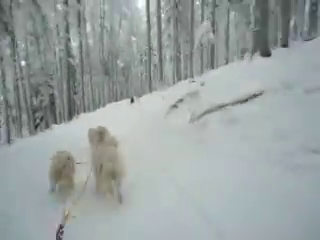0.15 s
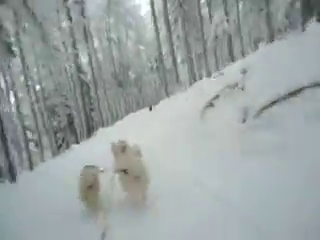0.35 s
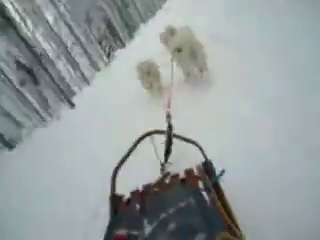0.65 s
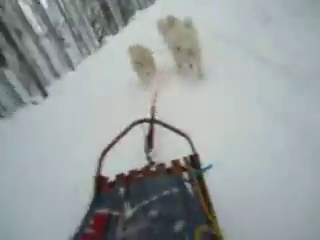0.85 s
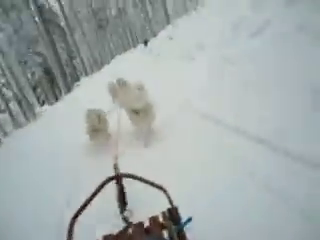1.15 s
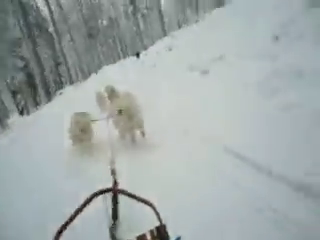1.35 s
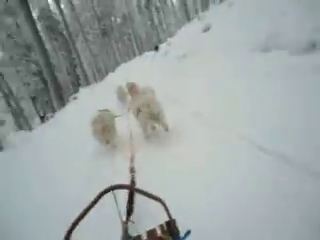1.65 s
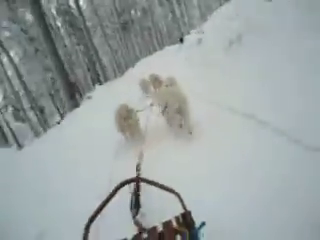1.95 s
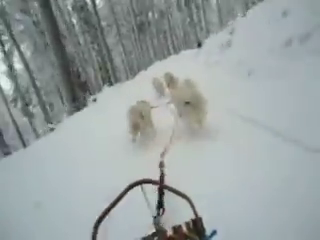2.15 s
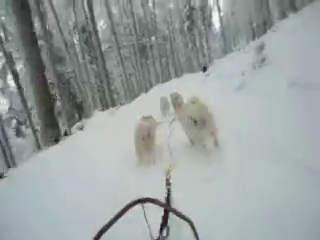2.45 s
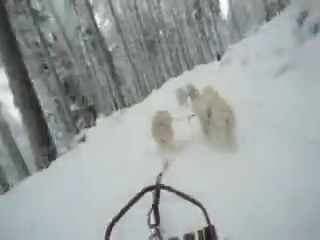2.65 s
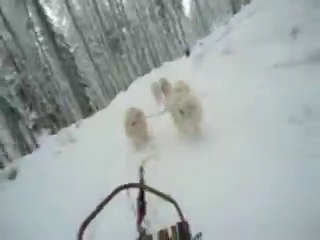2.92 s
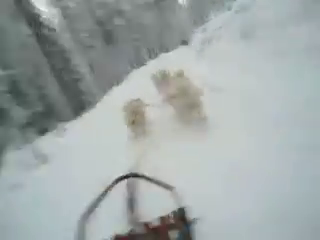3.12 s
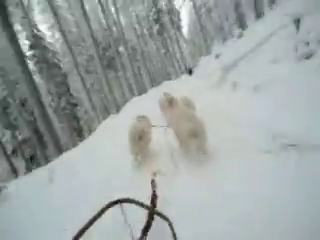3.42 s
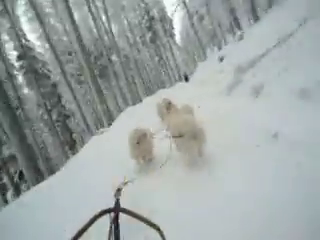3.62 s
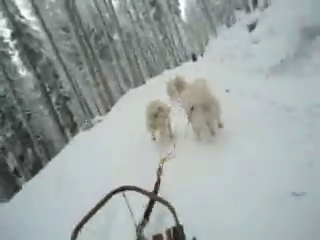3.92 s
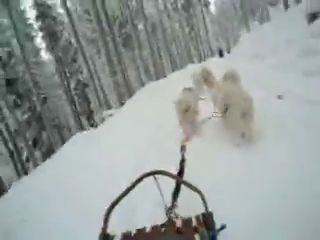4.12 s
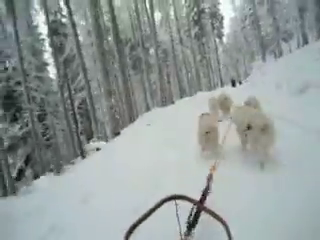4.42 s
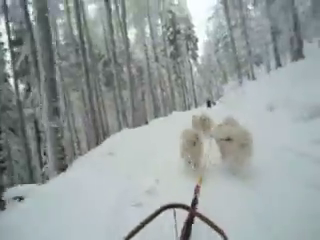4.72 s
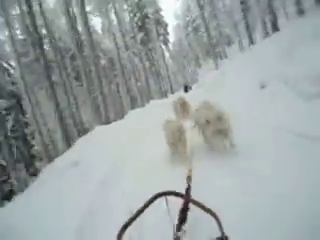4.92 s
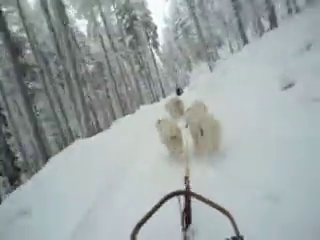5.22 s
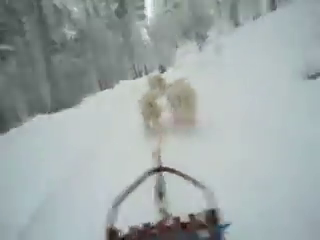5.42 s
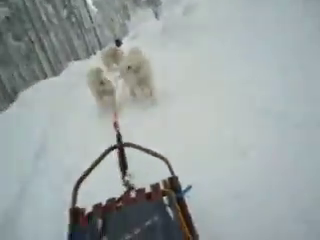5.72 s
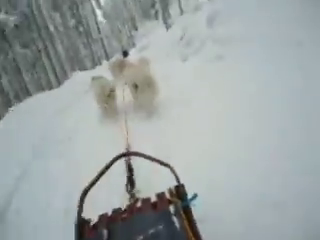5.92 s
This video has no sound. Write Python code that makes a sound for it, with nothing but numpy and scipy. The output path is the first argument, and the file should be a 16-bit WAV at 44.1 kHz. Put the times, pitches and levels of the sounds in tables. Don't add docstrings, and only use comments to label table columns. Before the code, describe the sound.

Rough, clipped wind buffeting with thuds, snaps and brief dropouts, over the grainy hiss of a dog sled on packed snow.

```python
import sys
import numpy as np
from scipy import signal
from scipy.fft import rfft, irfft
from scipy.io import wavfile
from scipy.ndimage import uniform_filter1d

SR = 44100
rng = np.random.default_rng(int(sys.argv[2]) if len(sys.argv) > 2 else 0)


def unload_audio(sound):
    columns = np.transpose(np.atleast_2d(sound))
    steps = np.round(np.clip(columns, -1, 1) * 32767)
    wavfile.write(sys.argv[1], SR, steps.astype(np.int16))


def nominal_scale(level):
    x = np.asarray(level, float) / 20
    return 10 ** x


N = 267585
TIME = np.arange(N) / SR
STOP = .692

# [t/s, eddy pressure over the overload point/dB, flapping rate f/Hz]
WIND = [(0, -3, 79.1), (0.252, -10, 91), (.45, 3, 92), (0.752, 4.5, 157.4), (0.899, 11, 302),
        (1.1, 4, 115.7), (1.6, 3, 66.3), (2.098, 14, 150), (2.22, 14.5, 279), (2.752, 9.5, 157.4),
        (2.922, 22.5, 248), (3.049, -16, 131.5), (3.201, 26.5, 204), (3.45, 5.5, 120.4), (4.201, 1, 111),
        (4.319, 15.5, 135), (5.45, 15, 150), (6.07, -3, 44.9)]


def evened(x):
    return x / np.sqrt(np.mean(x ** 2) + 1e-20)


def read_spectrum(points, f):
    at, value = np.transpose(points)
    return np.interp(np.log(f + 0.0028), np.log(at), value)


def wander(hz):
    spectrum = rfft(rng.standard_normal(N))
    spectrum = spectrum / (1 + (np.fft.rfftfreq(N, 1 / SR) / hz) ** 4)
    return evened(irfft(spectrum, N))


def noise(gain, size):
    z = rng.standard_normal((gain.shape[1], len(gain), 2)).T
    z = (z[0] + 1j * z[1]) * gain / np.linalg.norm(gain, axis=0)
    sound = signal.istft(z, nperseg=size, noverlap=size * 3 // 4)[1]
    return evened(sound[:N])


def gate(starts, lengths_ms, heights):
    out = np.zeros(N)
    for s, ms, height in zip(starts, lengths_ms, heights):
        out[round(s * SR):round((s + ms / 1000) * SR)] = height
    return out


def wind_db():
    s, pressure_db, _ = np.transpose(WIND)
    return np.interp(TIME, s, pressure_db)


def eddies(shape, s, flap_hz, size):
    hz = np.fft.rfftfreq(size, 1 / SR)
    t = np.arange(4 * N // size + 5) * size / 4 / SR
    multiple = hz[:, None] / np.interp(t, s, flap_hz)
    return noise(nominal_scale(read_spectrum(shape, multiple)), size=size)


def headwind():
    calm, calm_db = lulls()
    flapping = large_eddies(calm, calm_db) + small_eddies(calm)
    push = air_lumps()
    held = uniform_filter1d(abs(push), 80)
    free = 1 - np.clip(1.7 * held, 0, 1)
    swell = 1.75 * uniform_filter1d(uniform_filter1d(push, 90), 90)
    creep = uniform_filter1d(uniform_filter1d(push, 400), 400)
    creep = 1.25 * calm * creep
    return STOP * (swell + creep + flapping * free)


def lulls():
    # [t/s, length/ms, eddy pressure level/dB]
    lull_list = [(0.323, 15, -7), (0.385, 10, 7.5), (0.401, 23, 0), (0.578, 20, -3.5), (1.402, 4.1, -1),
                 (1.422, 20, -5.5), (1.484, 11, -21), (1.522, 13, -16), (1.58, 10, -1), (1.619, 15, 0),
                 (1.801, 21, -1), (1.835, 10, -4), (2.118, 16, 0), (2.131, 32, -2), (2.171, 9, 9),
                 (3.126, 11, -10), (3.359, 12, -13), (3.882, 16, -2.5), (4.117, 34, -10), (4.402, 18, 2),
                 (4.948, 11, -5), (5.147, 14, -10.5), (5.793, 11, -13), (5.823, 13, 2), (5.857, 16, -5.3),
                 (5.902, 14, -5.5), (5.946, 7.6, 1.5), (5.984, 16, -6), (6.027, 13, -3.5), (6.049, 19, -5)]
    s, ms, lull_db = np.transpose(lull_list)
    calm = uniform_filter1d(gate(s, ms, np.ones(len(s))), 90)
    return calm, uniform_filter1d(gate(s, ms, lull_db), 90)


def large_eddies(calm, calm_db):
    # [multiple of the flapping rate, level/dB]
    large_shape = [(.1, -2), (.3, 2.5), (.7, -1.5), (1.4, -8.5), (3, -18), (8, -51.5), (30, -89.5)]
    s, _, flap_hz = np.transpose(WIND)
    large = eddies(large_shape, s, 0.6074 * flap_hz, size=2048)
    large_db = 0.687 * wind_db() + 2.4 * wander(hz=30.2)
    large *= nominal_scale((1 - calm) * large_db + calm_db)
    buffet_db, buffet_hz, buffet_from_db = -1, 65, -2
    wind_up = 1 / (1 + nominal_scale(2 * (buffet_from_db - wind_db())))
    buffets = np.tanh(2.5 * wander(hz=buffet_hz))
    return large + nominal_scale(buffet_db) * wind_up * (1 - calm) * buffets


def small_eddies(calm):
    # [t/s, length/ms, crackle
    # level/dB]
    flurry_list = [(0.264, 1.4, -84), (0.531, 7.3, -48.5), (0.884, 16, -42), (0.916, 77, -42),
                   (0.989, 1.5, -5.5), (1.455, 3, -35.5), (2.132, 1.3, -20), (2.165, 201.8, -50),
                   (2.403, 17, -33.5), (2.463, 210, -42), (2.672, 65.9, -35.5), (2.795, 8.7, -51.5),
                   (2.833, 170, -36), (3.141, 41, -38.5), (3.194, 11, -9), (3.295, 29, -37.5),
                   (3.502, 4.3, -29), (4.017, 25.4, -45), (4.437, 43.0, -60), (4.597, 18, -58),
                   (4.668, 26, -31.5), (4.793, 74.1, -46), (4.881, 48, -45.5), (4.961, 88, -56),
                   (5.112, 22, -20.5), (5.171, 24, -65.5), (5.29, 67, -54), (5.51, 37.4, -48.5),
                   (5.926, 2.2, -37.5), (6.066, 6, -12.5)]
    # [multiple of the flapping rate, level/dB]
    small_shape = [(.15, -1.5), (.4, -1.5), (.8, -1.5), (1.5, -8), (3, -16.5), (8, -43.5), (30, -103.5)]
    s, ms, crackle_db = np.transpose(flurry_list)
    flap_hz = 277.3 + 150 * np.exp(-ms / 15.3)
    small = eddies(small_shape, s + ms / 2000, flap_hz, size=512)
    ripple = nominal_scale(-13 + wind_db())
    crackle = gate(s, ms, nominal_scale(12.0 + 0.45 * (crackle_db + 43.5)))
    small *= (ripple + uniform_filter1d(crackle, 60)) * (1 - calm)
    small *= nominal_scale(3.67 * wander(hz=153.0))
    return small * nominal_scale(3.5 * wander(hz=70))


def runners():
    # [f/Hz, level per Hz/dB]
    hiss_shape = [(200, -5.5), (700, 8), (1500, 4), (2500, 2), (3500, -1), (4700, -4.5), (5400, -1.5)]
    # [t/s, level/dB]
    slide = [
        (0, -36),
        (.6, -21),
        (1.502, -24),
        (2.1, -45.5),
        (3.1, -25),
        (3.699, -21.5),
        (4.199, -18),
        (5, -18.5),
        (6.1, -27),
    ]
    hz = np.fft.rfftfreq(256, 1 / SR)
    gain = nominal_scale(read_spectrum(hiss_shape, hz))[:, None] * np.ones(N // 64 + 5)
    hiss = noise(gain, size=256)
    s, slide_db = np.transpose(slide)
    grain_db = 2.5 * wander(hz=250)
    track_db = 1.54 * wander(hz=23.8)
    return hiss * nominal_scale(np.interp(TIME, s, slide_db) + track_db + grain_db)


def snapped(pressure):
    # [t/s, length/ms]
    snap_list = [(.064, 1.8), (0.312, 2), (.342, .9), (0.453, 2), (0.523, .5), (.577, 2), (0.679, 1.7),
                 (.753, 2.6), (0.85, 2), (1.201, 1.7), (1.225, 1.9), (1.381, 1.1), (1.389, 1.5),
                 (1.469, .5), (1.561, 2), (1.794, 2), (1.917, 2), (1.952, 2.6), (3.094, 2), (3.54, 1.5),
                 (3.684, 1.7), (3.707, 1.2), (3.839, 0.071), (3.462, 2), (3.506, 1.554), (3.587, 1.2),
                 (2.045, 3.2), (5.576, 0.64), (5.655, 1), (5.703, 2)]
    snap_db, edge_ms = 6, 0.37
    s, ms = np.transpose(snap_list)
    lean = np.sign(uniform_filter1d(pressure, size=200))[(s * SR).astype(int)]
    edge = max(round(edge_ms * SR / 1000), 2)
    throw = uniform_filter1d(gate(s, ms, -lean), edge)
    return pressure * (1 - abs(throw)) + STOP * nominal_scale(snap_db) * throw


def air_lumps():
    # [t/s, length/ms]
    pushes = [(0.546, 26), (0.624, 38), (0.694, 37), (0.804, 33), (1.03, 28), (1.176, 19), (1.252, 93),
              (1.496, 29), (1.588, 30), (1.659, 39), (1.844, 46), (2.055, 35), (2.375, 30), (2.749, 37),
              (3.022, 20), (3.108, 20), (3.37, 65), (3.477, 27), (3.594, 34), (3.634, 19), (3.818, 21),
              (3.84, 42), (3.94, 34), (4.147, 36), (4.196, 24), (4.508, 23), (5.37, 24), (5.624, 24),
              (5.726, 45), (5.872, 20)]
    # [t/s, length/ms]
    pulls = [(0.351, 25), (0.732, 21), (0.756, 41), (0.965, 17), (0.99, 24), (1.058, 35), (1.203, 22),
             (1.538, 23), (1.701, 50), (1.757, 38), (1.954, 18), (1.976, 19), (2.012, 22), (2.093, 23),
             (2.646, 26), (2.982, 24), (3.061, 33), (3.22, 23), (3.278, 21), (3.335, 24), (3.542, 43),
             (3.914, 19), (3.984, 18), (4.226, 41), (4.267, 29), (5.24, 23), (5.496, 18), (5.556, 18),
             (5.834, 23), (5.956, 29)]
    # [t/s, length/ms, side (+1 push, -1 pull)]
    jolts = [(.231, 9, 1), (.313, 9, -1), (.494, 11, -1), (.663, 14, -1), (.852, 14, 1), (.868, 13, -1),
             (.903, 16, 1), (1.096, 11, 1), (1.349, 10, -1), (1.365, 33, -1), (1.443, 11, -1),
             (1.458, 27, -1), (1.569, 11, -1), (1.633, 10, 1), (1.927, 9, -1), (2.0, 11, 1), (2.43, 10, -1),
             (2.449, 13, -1), (2.538, 12, 1), (2.72, 10, 1), (3.178, 14, 1), (3.318, 12, 1),
             (3.444, 13, -1), (3.514, 10, -1), (3.685, 12, -1), (3.754, 11, -1), (3.767, 14, 1),
             (5.578, 13, -1), (5.689, 13, -1), (4.37, 9, -1)]
    push = gate(*np.transpose(pushes), np.ones(len(pushes)))
    pull = gate(*np.transpose(pulls), -np.ones(len(pulls)))
    return np.clip(push + pull + gate(*np.transpose(jolts)), -1, 1)


def crust():
    # [t/s, level/dB, length/ms, centre f/Hz]
    crunches = [(0.261, -4.5, 5.8, 3240), (0.287, -15.5, 6.2, 3820), (1.014, -13, 4.6, 3500),
                (1.53, -28, 11.4, 3420), (1.814, -21.5, 12.5, 3540), (2.119, -17.5, 19.5, 3180),
                (2.146, -16, 13, 3470), (3.263, -17, 19, 3470), (3.589, -0.5, 5.9, 3300),
                (3.632, -18, 5.2, 3500), (3.886, -18.5, 17, 3370), (3.916, -14, 6.8, 3480),
                (4.1, -29, 7, 3450), (4.13, -25, 21, 3770), (4.215, -9, 16, 4040), (4.961, -30, 5.6, 3500),
                (5.486, -18, 20, 3300), (5.545, -7, 4, 2940), (5.855, -22, 8.3, 3560),
                (5.925, -5, 6.8, 2660), (5.943, -19, 5.2, 2200), (6.03, -13.5, 5.6, 3000)]
    size = 1500
    out = np.zeros(N + size)
    snaps = rng.standard_normal((len(crunches), size))
    t = np.arange(size) / SR
    for (s, db, ms, hz), snap in zip(crunches, snaps):
        ring = signal.lfilter(*signal.iirpeak(hz, 1.3, SR), snap)
        u = t * 1000 / ms
        attack = 1 - np.exp(-u / .08)
        out[round(s * SR):][:size] += nominal_scale(db) * evened(ring) * attack * np.exp(-1.6 * u ** 2)
    return out[:N]


def scene():
    return (snapped(headwind()) + runners() + crust())[None]


def band_limit(x):
    return signal.sosfilt(signal.butter(12, 16600, fs=SR, output="sos"), x)


def record(dry):
    ceiling, edge_hz = .707, 16000
    slow = signal.resample_poly(dry, 1, 4, axis=1, padtype="edge")
    slow = np.clip(slow, -STOP, STOP)
    steep = signal.firwin(129, .25, window=("kaiser", 10.))
    full = signal.resample_poly(slow, 4, 1, axis=1, window=steep, padtype="edge")[:, :N]
    edge = signal.firwin(101, edge_hz, window=("kaiser", 7.), fs=SR)
    limited = signal.oaconvolve(np.clip(full, -ceiling, ceiling), edge[None], "same")
    return band_limit(limited)


dry = scene()
out = record(dry)
unload_audio(out)
```